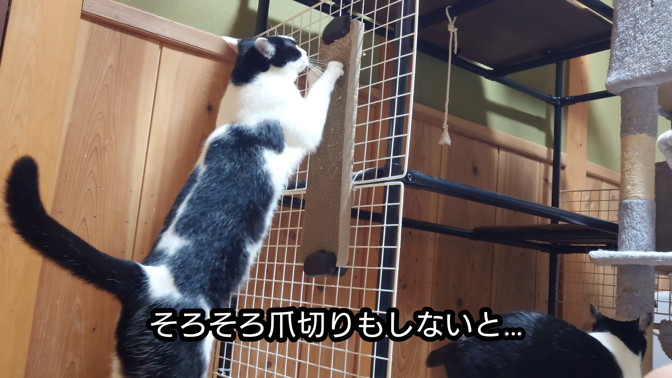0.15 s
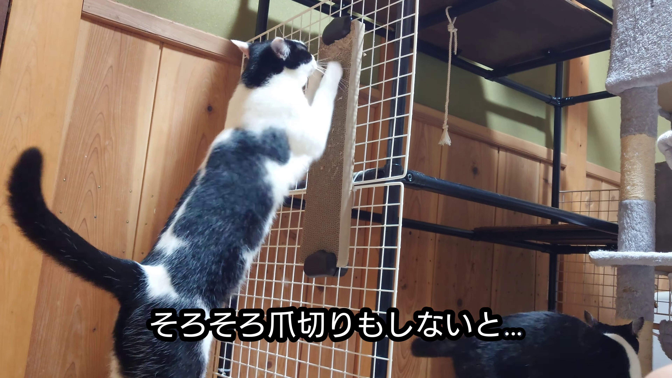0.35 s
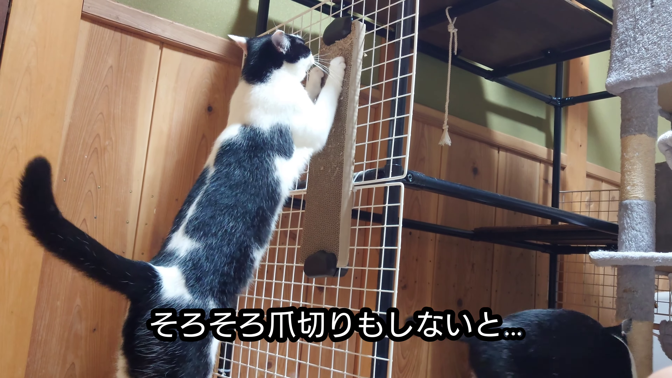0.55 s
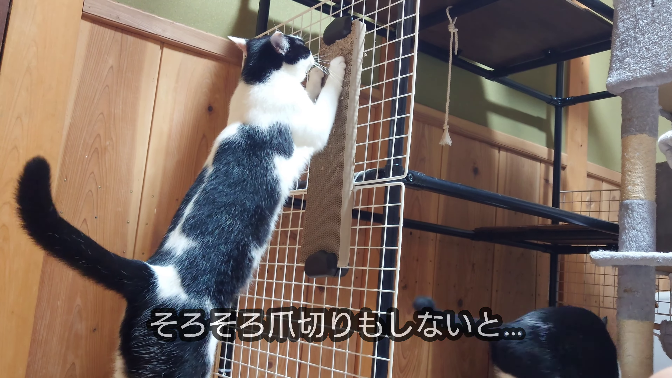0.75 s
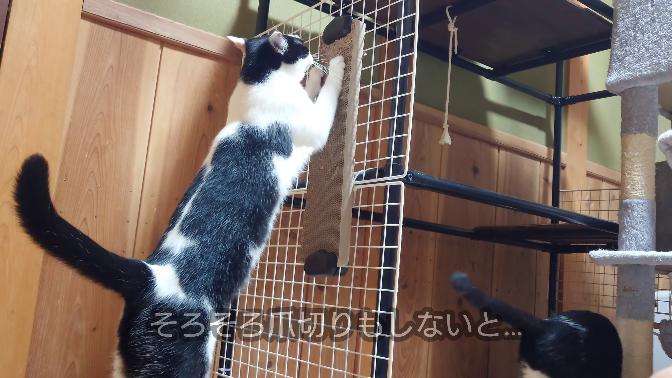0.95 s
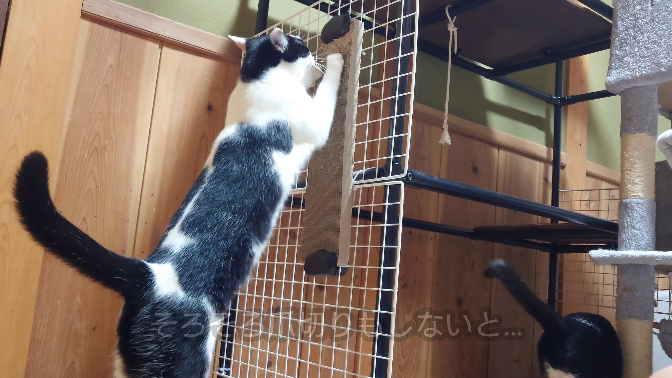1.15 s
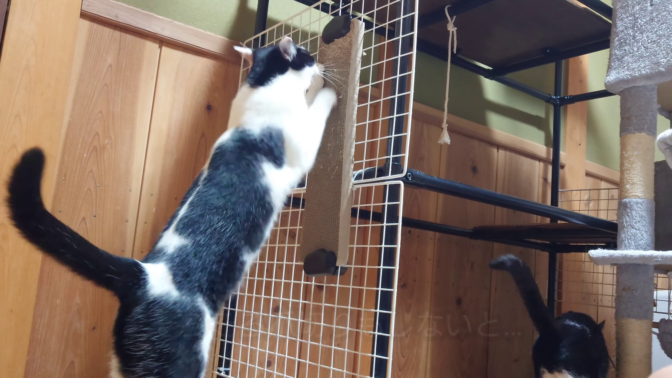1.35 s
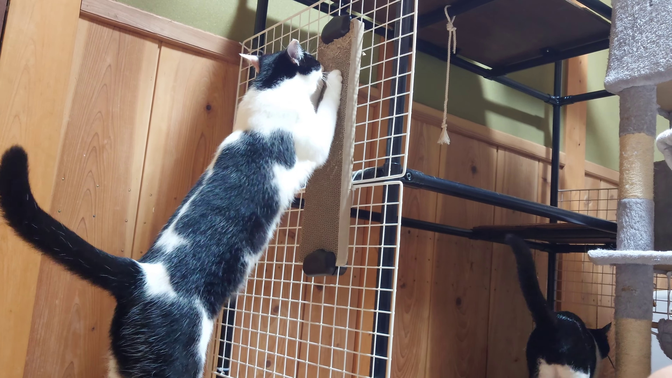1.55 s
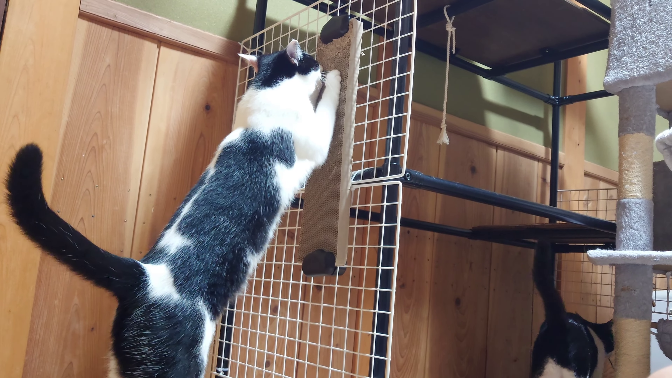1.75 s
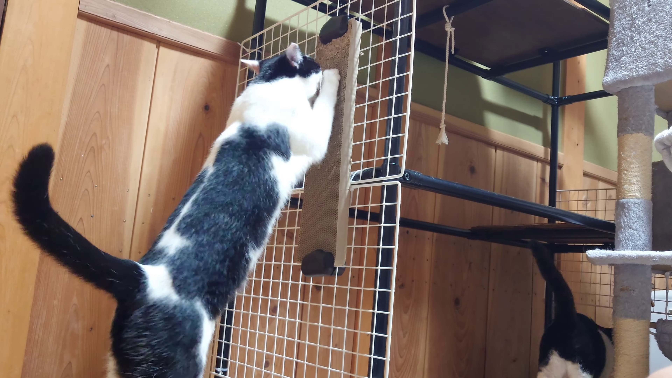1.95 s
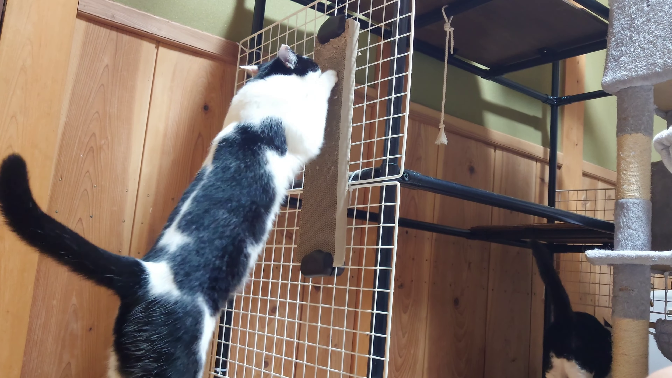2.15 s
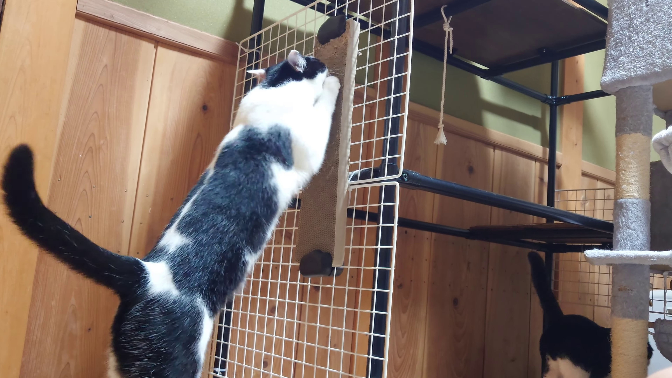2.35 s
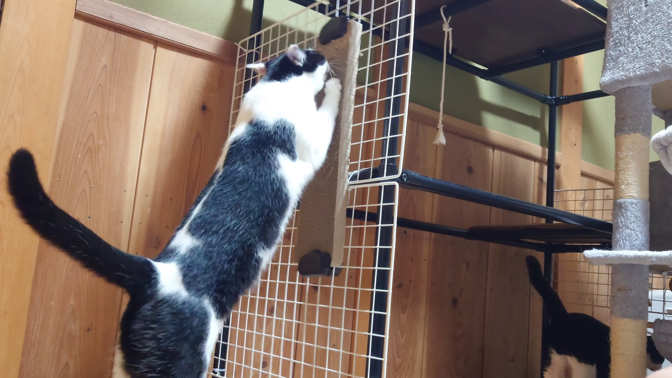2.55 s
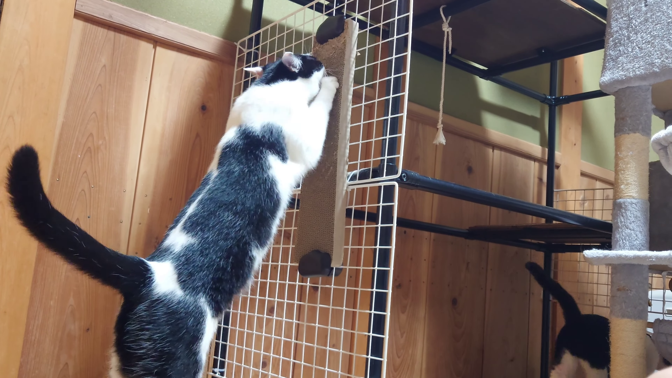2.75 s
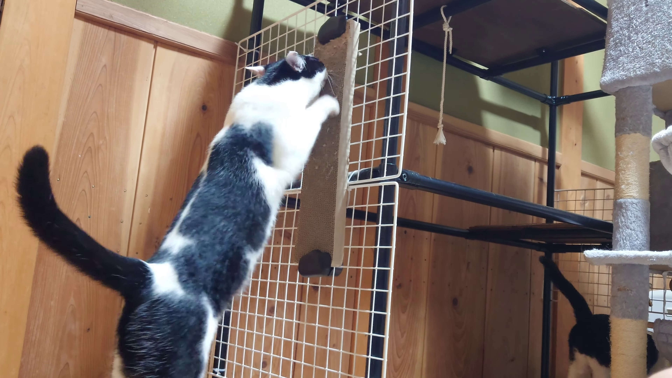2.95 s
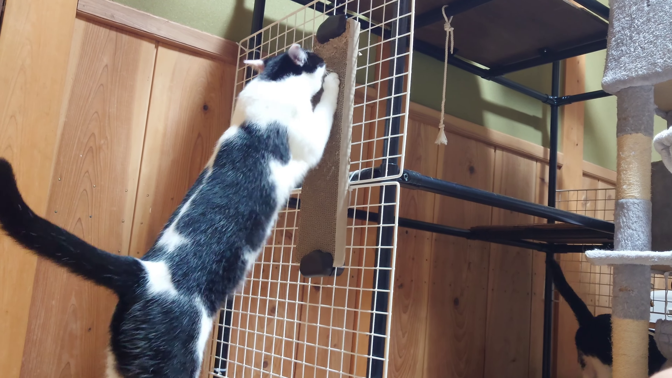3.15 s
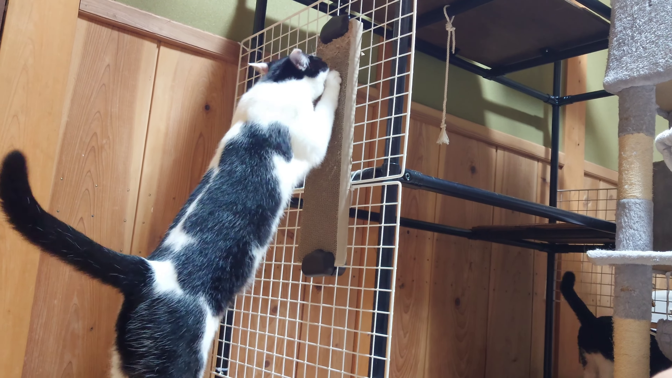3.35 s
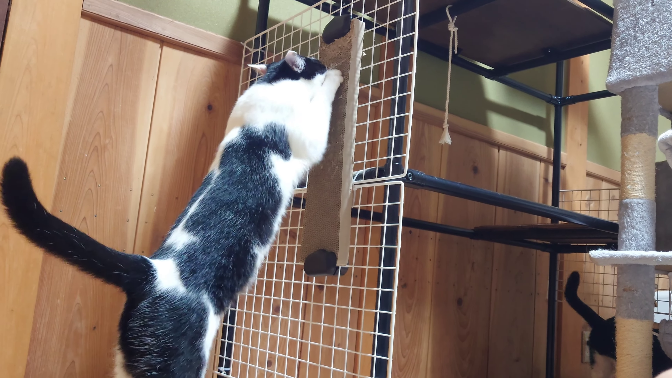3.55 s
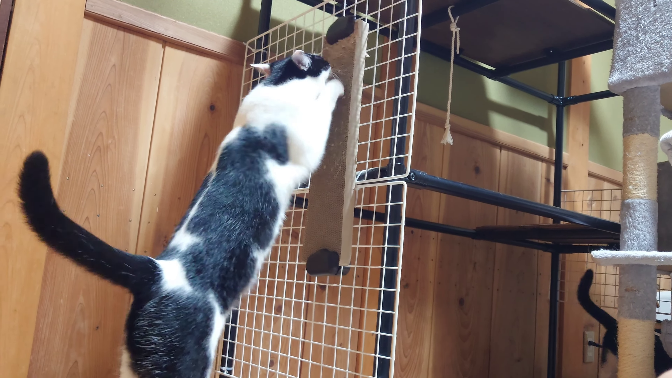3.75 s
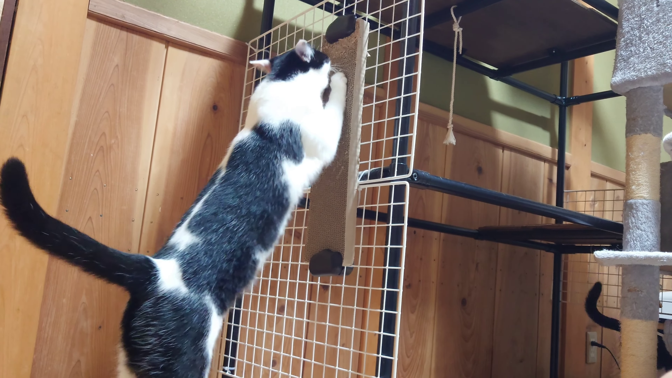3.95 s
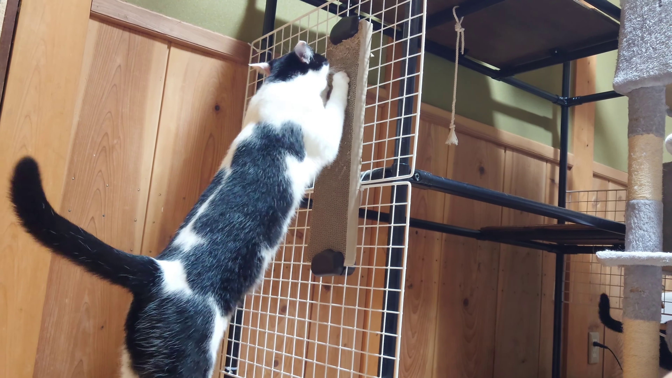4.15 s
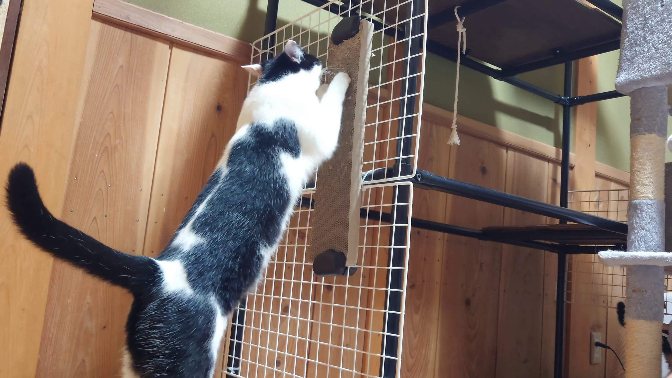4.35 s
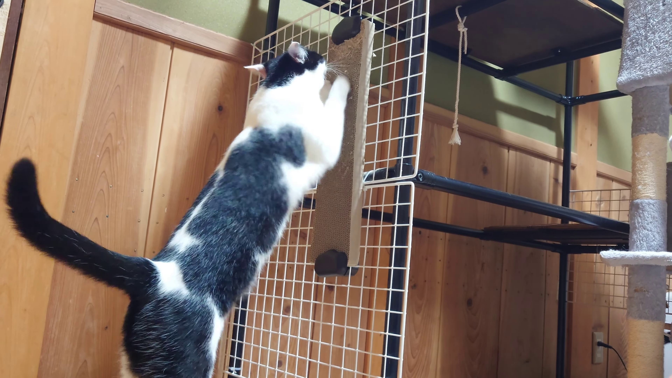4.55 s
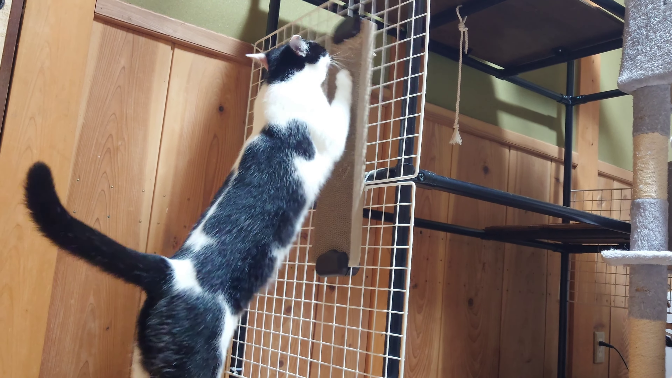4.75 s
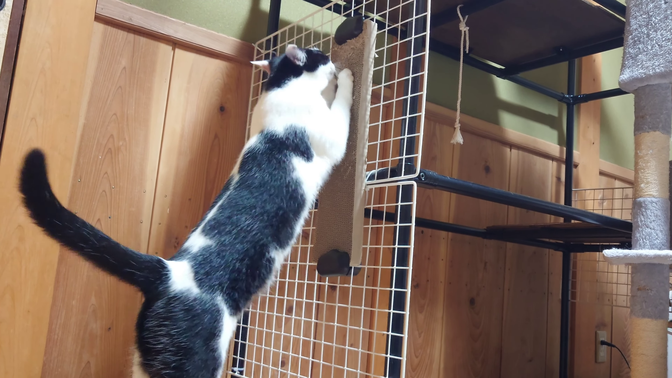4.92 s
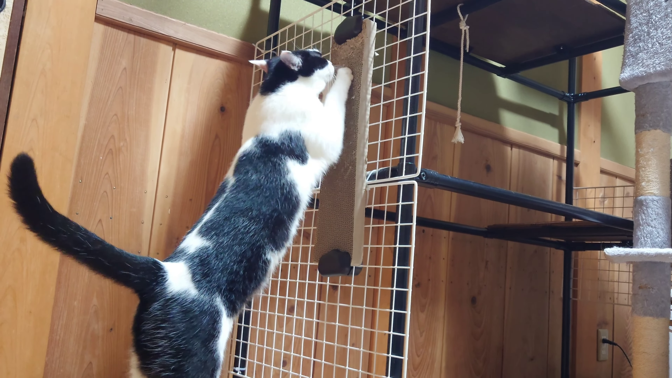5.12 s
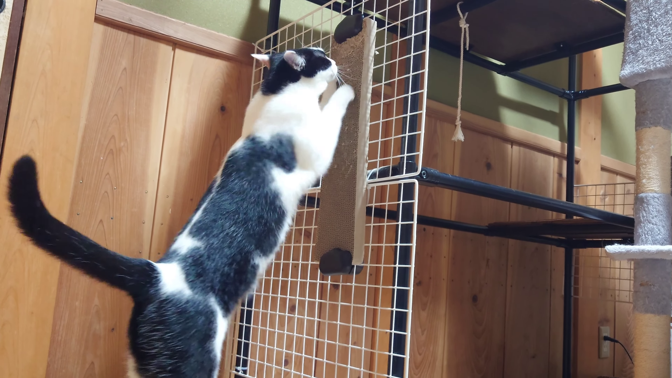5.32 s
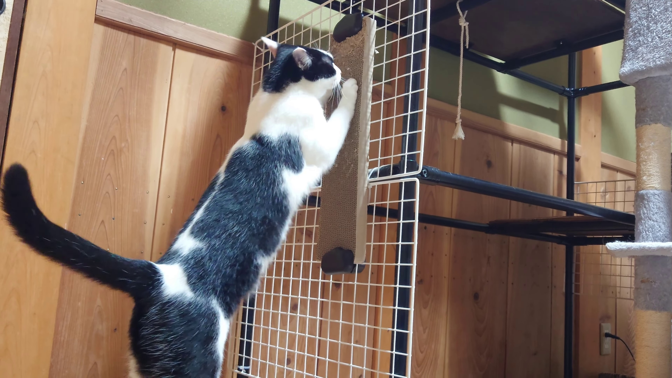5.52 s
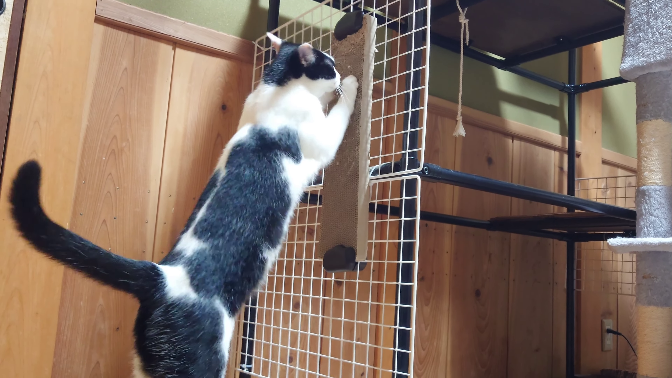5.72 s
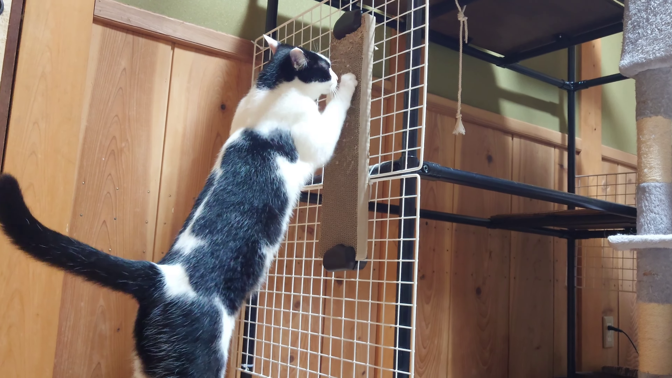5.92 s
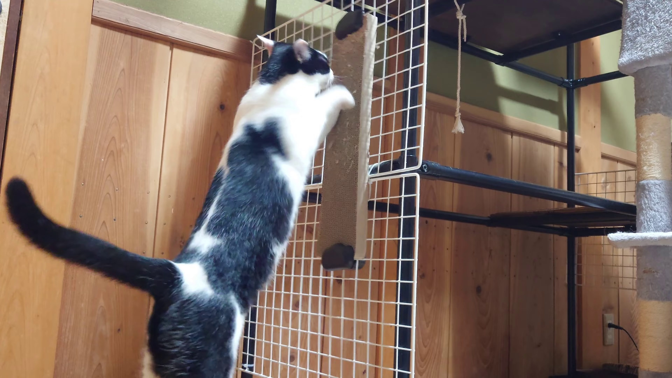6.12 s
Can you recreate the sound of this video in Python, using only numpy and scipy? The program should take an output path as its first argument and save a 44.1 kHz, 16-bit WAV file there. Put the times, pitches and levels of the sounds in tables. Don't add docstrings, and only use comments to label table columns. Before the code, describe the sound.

A cat rakes a cardboard scratcher hung on wire mesh in quick rasping strokes, the board slapping and rattling, with low frame thumps indoors.

```python
import sys
import numpy as np
from scipy import signal
from scipy.fft import rfft, irfft, next_fast_len
from scipy.io import wavfile
from scipy.ndimage import uniform_filter1d

SR = 44100
rng = np.random.default_rng(int(sys.argv[2]) if len(sys.argv) > 2 else 0)


def transcribe(u):
    v = np.clip(np.atleast_2d(u).T, -1, 1)
    q = np.round(v * 32767).astype(np.int16)
    wavfile.write(sys.argv[1], SR, q)


def rack_gain(trim_db):
    fader = np.asarray(trim_db, float)
    return 10 ** (fader / 20)


N = 272538
SIZE = next_fast_len(N + SR)
HZ = np.arange(SIZE // 2 + 1) * SR / SIZE + 1e-3
TIME = np.arange(N) / SR


def level(x, db):
    return x * rack_gain(db) / np.sqrt(np.mean(x ** 2))


def along(table):
    hz, value = np.transpose(table)
    return np.interp(np.log(HZ), np.log(np.maximum(hz, 1)), value)


def shape(x, gain):
    return irfft(rfft(x, SIZE) * gain, SIZE)[..., :N]


def decay(age, t60):
    return np.exp(-np.log(1000) * age / t60)


def resonances(table):
    response = 0
    for k, (hz, width, db) in enumerate(table):
        damping = 1j * width * HZ
        response = response + (-1) ** k * rack_gain(db) * damping / (hz * hz - HZ ** 2 + damping)
    return response


def causal(gain_db):
    cepstrum = irfft(gain_db * np.log(10) / 20, SIZE)
    cepstrum[1:SIZE // 2] *= 2
    cepstrum[SIZE // 2 + 1:] = 0
    return np.exp(rfft(cepstrum))


def pair(likeness):
    mid, side = rfft(rng.standard_normal((2, SIZE)))
    c = np.clip(likeness, 0, .999)
    return np.sqrt(1 + c) * mid + np.sqrt(1 - c) * side * np.array([[1], [-1]])


def steady(x, smooth_s):
    return x / np.sqrt(uniform_filter1d(np.mean(x ** 2, axis=0), int(smooth_s * SR)))


def swells(s, db, rise_db_s, fall_db_s):
    slow = TIME[::64]
    age = slow - s[:, None]
    effort_db = db[:, None] + np.where(age < 0, rise_db_s, -fall_db_s) * age
    gain = np.sqrt(np.sum(rack_gain(2 * effort_db), axis=0))
    return np.interp(TIME, slow, uniform_filter1d(gain, size=17))


def grit(rate, scatter_db):
    hit = rng.random(N) < rate / SR
    size = rack_gain(scatter_db * np.minimum(rng.exponential(size=N), 4.))
    return level(hit * rng.standard_normal(N) * size, 0)


def chatter(rate, depth_db):
    hold = int(SR / rate)
    steps = rng.standard_normal((5, N // 100))[:, :N // hold + 1]
    grip = np.repeat(steps[0] + 0.58 * steps[1:], hold, axis=1)
    return rack_gain(depth_db * uniform_filter1d(grip, hold // 2)[:, :N])


# start in seconds, peak in dB, treble in dB, rattle t60 in seconds.
SLAPS = [(0.001, -43, -0.5, 0.059), (0.3955, -25, -6.5, 0.03), (1.4435, -41.5, 4.5, 0.13),
         (2.0342, -31.5, 1.5, 0.032), (2.3885, -28, 0.5, 0.058), (2.7294, -26.5, -2, 0.064),
         (3.0773, -25, -5, 0.056), (3.4105, -21.5, 1, 0.051), (3.859, -19.5, 1, 0.034),
         (4.1993, -23, 1, 0.056), (4.6118, -28.5, 2.5, 0.038), (4.971, -23.5, 2.5, 0.064),
         (4.9887, -29.5, -10.5, 0.097), (5.0524, -22.5, 2, 0.037), (5.4065, -31, 0, 0.092),
         (5.8089, -23, -1.5, 0.053)]
# start in seconds, peak in dB, treble in dB, rattle t60 in seconds.
CATCHES = [(0.2797, -47.5, -2, 0.039), (0.3266, -61.5, -0.5, 0.4), (0.364, -39, -2, 0.058),
           (1.252, -75, 15, 0.13), (1.289, -75, 15, .081), (1.3116, -67, 1, 0.2), (1.3542, -68.5, 5, 0.14),
           (1.3958, -56.5, 5, 0.19), (1.4106, -49.5, -14.5, 0.082), (2.011, -44, -1, 0.041),
           (2.0254, -47, -1, .1), (2.3559, -36.5, 3, 0.037), (2.6867, -36.5, -18, 0.019),
           (2.6995, -34, -2.5, 0.053), (3.02, -63, -11, .1), (3.039, -47, -13, 0.096),
           (3.0509, -31.5, 3, 0.018), (3.3815, -33, -4.5, 0.04), (3.8161, -46, -24, 0.11),
           (3.8284, -34.5, 0.5, 0.036), (4.1399, -54.5, -4, 0.13), (4.1713, -46.5, -3, 0.2),
           (4.5016, -53, 3, 0.065), (4.577, -43, 1, 0.034), (4.943, -36.5, -1, 0.15),
           (5.3557, -51.5, -18, 0.061), (5.3706, -42, -0.5, 0.03), (5.7716, -46.5, -3, .05),
           (5.7796, -41, -7, 0.047)]
# start in seconds, peak in dB, treble in dB, rattle t60 in seconds.
BOUNCES = [(0.094, -41.5, 3.5, 0.014), (0.4524, -57.5, -4, 0.062), (0.588, -55.5, 2, 0.13),
           (0.715, -57, -9, 0.095), (1.5902, -51.5, 8.5, 0.024), (2.0786, -45.5, 6, 0.058),
           (2.159, -38.5, -2, 0.025), (2.256, -44.5, 0, 0.021), (2.561, -50.5, 10, 0.015),
           (2.613, -43.5, 1, 0.022), (2.8014, -48, -19, 0.032), (2.893, -56, 7.5, 0.03),
           (2.99, -60.5, 2.5, 0.035), (3.1631, -40.5, 7, 0.032), (3.33, -66, 12.5, .04),
           (3.2093, -47.5, -46, 0.037), (3.5485, -45, 3.5, 0.091), (3.712, -58, 0, 0.13),
           (3.79, -67, 4, 0.026), (4.0174, -43, -3, 0.062), (4.2984, -48, 2, 0.37),
           (4.4574, -64, -17, 0.11), (4.7025, -40, -2.5, 0.027), (4.811, -39, -4, 0.032),
           (4.8453, -40, 1, 0.023), (5.2718, -51, -0.5, 0.068), (5.5313, -51.5, 3, 0.06),
           (5.97, -50, 7.5, 0.038), (6.0886, -42.5, -6, 0.034), (6.12, -43.5, 3, 0.042)]


def blows():
    power = np.zeros((4, N))
    for kind, dull_db, rise_s in ((SLAPS, -9, .004), (CATCHES, -3, .0018), (BOUNCES, -5.5, .0018)):
        for s, db, treble_db, t60 in kind:
            i = int(s * SR)
            age = TIME[:min(N - i, SR // 3)]
            rise = 1 - np.exp(-age / (rise_s * np.array([[1.3], [1], [.7], [.5]])))
            burst = rise * decay(age, max(t60, .004) * np.array([[1.2], [1], [.9], [.7]]))
            burst = burst * (1 + np.array([[0], [0], [.3], [.4]]) * np.exp(-age / 0.0039))
            tilt_db = np.array([[dull_db], [0], [0.89 * treble_db + 0.2], [treble_db - .6]])
            power[:, i:i + len(age)] += (rack_gain(db + tilt_db) * burst) ** 2
    return power


# time in seconds, hiss in dB, dull rub in dB.
DRAGS = [(0.0, -60.5, -58), (0.2, -70.5, -70), (0.481, -55, -62), (0.65, -72, -71.5), (1.43, -72, -83),
         (1.51, -64, -52.5), (1.6, -71.5, -56.5), (2.19, -68, -81), (2.44, -48, -47), (2.7, -75, -69),
         (2.86, -57, -59), (3.0, -79, -66), (3.18, -75, -69), (3.29, -63.5, -72.5), (3.48, -50, -52.5),
         (3.85, -68, -73), (4.06, -82, -63.5), (4.3, -76, -75), (4.65, -67, -79), (4.8, -58.5, -67.5),
         (4.92, -59.5, -55.5), (5.05, -60, -66), (5.2, -56.5, -70), (5.35, -72, -78), (5.44, -62, -47),
         (5.959, -52, -52), (6.019, -74, -53)]


def drags():
    s, hiss_db, rub_db = np.transpose(DRAGS)
    hiss, rub = (swells(s, db, rise_db_s=179.5, fall_db_s=130) for db in (hiss_db, rub_db))
    return np.array([rub, (rub + hiss) / 2, hiss, hiss]) * rack_gain(np.array([[-6.], [-7.], [-7.], [-10.]]))


# frequency in Hz, density in dB per Hz.
RATTLE = [(460, -20.5), (780, -6), (900, -6.5), (1460, -6), (1860, -11), (2270, -5.5), (3080, -11),
          (3910, -6), (4720, -10), (6800, -2.5), (8530, -4), (10300, -1.5), (13600, -12), (15800, -15.5)]
# frequency in Hz, width in Hz, level in dB.
WIRES = [(895, 90, -4), (1538, 35, 13.5), (2270, 39, -3.5), (3250, 33, -19), (3940, 76, 6), (4360, 47, -69),
         (5530, 63, -41.5), (5700, 62, -15.5), (7020, 110, 1.5), (7600, 18, 10.5)]


def rattle():
    force = np.sqrt(blows() + drags() ** 2) * chatter(260, depth_db=2.5)
    body = causal(along(RATTLE))
    wires = resonances([(hz, max(width, 75), db) for hz, width, db in WIRES])
    impacts = grit(7000, scatter_db=3.0)
    lows = [0]
    for edge_hz in (1800, 4500, 8500):
        lowpass = signal.butter(3, edge_hz, fs=SR, output="sos")
        lows.append(signal.sosfilt(lowpass, impacts))
    lows.append(impacts)
    card = 0
    for k in range(4):
        part = lows[k + 1] - lows[k]
        card = card + shape(force[k] * part, body) / np.std(shape(part, body))
    card = card * rack_gain(-1.5)
    hard = np.minimum(force[1] / rack_gain(-30.0), 1)
    return card + rack_gain(-6.0) * shape(card * hard, wires)


# start in seconds, peak in dB, centre in Hz.
TICKS = [(0.027, -39.5, 4800), (0.0927, -44.5, 3970), (0.112, -45, 4000), (0.5475, -38.5, 4000),
         (0.5933, -41, 2440), (1.5928, -38.5, 5780), (2.08, -33, 6860), (3.1656, -38, 6960),
         (3.209, -28, 4200), (3.428, -27, 1500), (3.454, -33, 2400), (3.7115, -52, 2910),
         (3.725, -47, 2160), (4.6129, -32, 6850), (4.813, -44, 2410), (4.9437, -27.5, 3300),
         (4.9776, -31.5, 6860), (4.991, -16.5, 1480), (5.2719, -37.5, 3980), (5.289, -40, 3600),
         (5.535, -39, 3790), (5.7114, -54.5, 3500), (5.781, -43, 1530), (6.1223, -43, 6730),
         (0.364, -29.5, 2430), (0.586, -39, 3600), (1.287, -52, 3700), (1.3147, -40.5, 4360),
         (1.3995, -39.5, 5450), (1.412, -25.5, 4060), (2.157, -31.5, 3870), (2.258, -37, 4450),
         (2.3594, -24.5, 2410), (2.561, -36, 2110), (2.614, -37.5, 2170), (2.6869, -26, 3600),
         (2.699, -29.5, 4220), (3.0516, -26, 5700), (3.373, -30.5, 2100), (3.3841, -24.5, 4530),
         (3.5507, -29.5, 4000), (3.8173, -27, 2430), (3.8305, -20, 4700), (4.1702, -24.5, 3970),
         (4.362, -36, 2200), (4.5082, -25, 3600), (4.574, -25, 4470), (4.8445, -28, 4020),
         (5.3568, -30, 3550), (5.3748, -24.5, 4360), (5.499, -40, 3250), (5.548, -33, 3800),
         (6.0907, -34.5, 2520)]


def ticks():
    out = np.zeros(N)
    age = TIME[:2000]
    for (s, db, hz), noise in zip(TICKS, rng.standard_normal((len(TICKS), 2000))):
        flute = signal.butter(2, [hz / 1.31, hz * 1.5], "bandpass", fs=SR, output="sos")
        crack = noise * decay(age, 0.016)
        snap = signal.sosfilt(flute, crack) + rack_gain(-21.5) * np.diff(crack, prepend=0)
        i = int(s * SR)
        out[i:i + 2000] += (rack_gain(db - 6.5) * snap / np.abs(snap).max())[:N - i]
    return out


# frequency in Hz, likeness from 0 to 1.
ALIKE = [(60, 0.92), (250, 1), (700, 0.3)]
# frequency in Hz, width in Hz, level in dB.
FRAME = [(64.8, 25.6, -2.5), (89.1, 9.2, 5.5), (126, 30, -10.5)]
# frequency in Hz, width in Hz, level in dB.
BOARD = [(146.4, 5.4, 2), (191, 36, -7.5), (240, 55, -6.5), (307.6, 39.5, -5), (357, 13, -3),
         (396.3, 16.1, 1.5), (462, 49, -6.5), (531.6, 14.3, -1), (645, 103, -16)]
# time in seconds, frame boom in dB.
HEAVES = [(0.0, -40.5), (0.1, -52), (0.3, -52.5), (0.448, -45.5), (0.648, -50), (0.86, -62.5),
          (1.29, -63.5), (1.461, -41.5), (1.549, -43.5), (1.7, -53), (2.062, -45), (2.148, -38),
          (2.412, -40), (2.53, -42), (2.66, -42.5), (2.77, -43), (3.07, -42), (3.178, -40.5),
          (3.422, -37.5), (3.51, -39), (3.65, -53), (3.89, -40), (3.97, -38), (4.12, -40), (4.231, -39),
          (4.38, -41.5), (4.54, -47), (4.72, -47), (5.5, -48.5), (5.9, -38)]
# time in seconds, board in dB, frame kick in dB.
SHUDDERS = [(0.02, -59.5, -65), (0.3, -62.5, -67), (0.439, -47.5, -47), (0.62, -61.5, -45.5),
            (1.33, -77, -55), (1.46, -51.5, -58), (1.538, -49, -46), (2.051, -57, -70), (2.18, -59, -66),
            (2.411, -45, -60), (2.53, -53, -60), (2.758, -43, -47), (2.9, -66, -45), (3.073, -45.5, -60),
            (3.178, -45, -60), (3.424, -42.5, -60), (3.65, -55.5, -57.5), (3.881, -41.5, -60),
            (4.0, -51, -60), (4.223, -42.5, -60), (4.36, -49, -60), (4.648, -47.5, -49), (4.86, -53.5, -43),
            (4.99, -40, -40), (5.05, -41.5, -43), (5.13, -63.5, -39.5), (5.431, -46, -48),
            (5.539, -53, -50), (5.824, -42.5, -42.5), (6.02, -50, -48)]


def panel():
    jerks = pair(along(ALIKE))
    boom_band = 1 / (1 + (HZ / 140) ** 6) / (1 + (42 / HZ) ** 4)
    frame = irfft(jerks * resonances(FRAME) * boom_band, SIZE)[:, :N]
    board = irfft(jerks * resonances(BOARD), SIZE)[:, :N]
    pull_s, pull_db = np.transpose(HEAVES)
    s, board_db, kick_db = np.transpose(SHUDDERS)
    rocking = swells(np.r_[pull_s, s], np.r_[pull_db, kick_db], rise_db_s=331, fall_db_s=84.5)
    shudder = swells(s, board_db, rise_db_s=403.5, fall_db_s=78.5)
    return steady(frame, smooth_s=0.067) * rocking + steady(board, smooth_s=0.036) * shudder


# frequency in Hz, t60 in seconds.
ROOM = [(400, 0.85), (1200, 0.54), (2400, 0.39), (3200, 0.38), (7000, 0.32), (13000, 0.35)]
# frequency in Hz, left lead in radians.
SPREAD = [(0, -4.5), (860, 1.2), (1640, -0.5), (2330, -0.7), (3530, 8.5), (3960, 3), (6200, 10), (7840, 17),
          (8270, 13), (11400, 27.5), (13000, 25), (13400, 42), (15600, 37), (16500, 46.5)]


def room(x, wet_db, count):
    age, tail = TIME[:SR], 0
    noise = rfft(rng.standard_normal((count, 2, SR)), SIZE)
    for k, (_, t60) in enumerate(ROOM):
        band = along([(hz, 1. * (j == k)) for j, (hz, _) in enumerate(ROOM)])
        tail = tail + irfft(noise * band, SIZE)[..., :SR] * decay(age, t60)
    tail = tail * (1 - np.exp(-age / 0.0012))
    tail = tail / np.sqrt(np.sum(tail ** 2) / (2 * count))
    blend = rng.standard_normal((40, count))
    blend = blend / np.linalg.norm(blend, axis=1, keepdims=True)
    blend = blend[(TIME / .18).astype(int)]
    wet = sum(shape(x * blend[:, k], rfft(tail[k], SIZE)) for k in range(count))
    direct = shape(x, np.exp(1j * along(SPREAD) * np.array([[.5], [-.5]])))
    return direct + rack_gain(wet_db) * wet


# frequency in Hz, density in dB per Hz.
FLOOR = [(15, -45), (25, -1.5), (82, 11), (217, -22), (285, -12.5), (476, -23), (775, -24), (1650, -23.5),
         (1800, -30.5), (16000, -32.5)]


def floor():
    return level(irfft(pair(along(ALIKE)) * rack_gain(along(FLOOR)), SIZE)[:, :N], -77)


def scene():
    return room(rattle(), wet_db=5.0, count=5) + room(ticks(), wet_db=-3.5, count=1) + panel()


# lower edge in Hz, threshold in dB.
HUSH = [(1700, -96.5), (2400, -90), (3000, -62), (3800, -57), (16500, 0)]
# lower edge in Hz, share of time dropped from 0 to 1.
STRIPS = [(7580, .55), (7920, .92), (8270, .97), (8610, .85), (8960, .3), (9300, .62), (9650, .55),
          (9990, .15), (10330, 0)]


def starve(x):
    hz, _, z = signal.stft(x, SR, nperseg=1024)
    hush = np.ones(z.shape[1:])
    for (lo, knee_db), (hi, _) in zip(HUSH, HUSH[1:]):
        band = (hz >= lo) & (hz < hi)
        rms = np.sqrt(np.sum(np.abs(z[:, band]) ** 2, axis=(0, 1))) + 1e-9
        hush[band] = np.clip((rms / rack_gain(knee_db)) ** .6, rack_gain(-15.), 1)
    z = z * uniform_filter1d(hush, size=21, axis=0)
    power = np.sum(np.abs(z[:, hz > 5000]) ** 2, axis=(0, 1))
    calm = power < 2.2 * np.roll(power, 1)
    mood = rng.random((len(STRIPS), len(power) // 4 + 1))
    mood = np.repeat(mood, 4, axis=1)[:, :len(power)]
    mood = mood + power / power.max()
    for (lo, share), (hi, _), chance in zip(STRIPS, STRIPS[1:], mood):
        z[:, (hz >= lo) & (hz < hi)] *= np.where(calm & (chance < share), .005, 1)
    return signal.istft(z, SR, nperseg=1024)[1][:, :N]


# frequency in Hz, left minus right in dB.
LEAN = [(60, 1), (110, 4.5), (200, 5.5), (380, -5), (700, 1), (1290, 0.5), (2380, 1.0), (4400, -0.5),
        (8120, -0.5), (15000, 6)]
# frequency in Hz, gain in dB.
TREBLE = [(6900, 2), (7700, -3), (8100, -13), (8800, -6.5), (9700, -1.5), (15750, 4), (16000, -43.5)]


def microphones(x):
    lean = along(LEAN) / 2
    return shape(x, rack_gain(np.array([lean, -lean]) + along(TREBLE)))


def band_limit(x):
    return signal.sosfilt(signal.butter(12, 16620, fs=SR, output="sos"), x)


def record(dry):
    mix = starve(microphones(dry)) + microphones(floor())
    return band_limit(mix)


dry = scene()
out = record(dry)
transcribe(out)
```